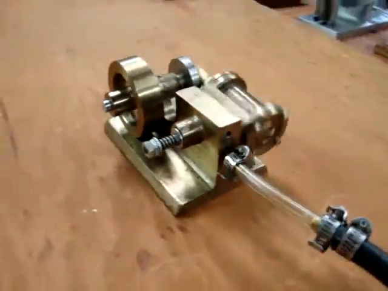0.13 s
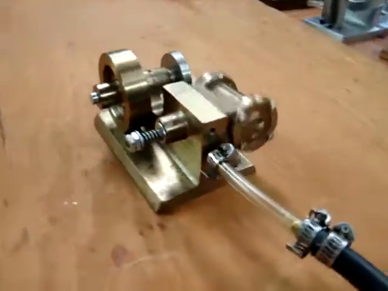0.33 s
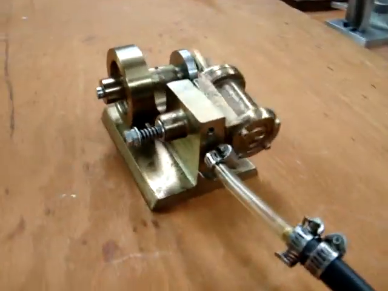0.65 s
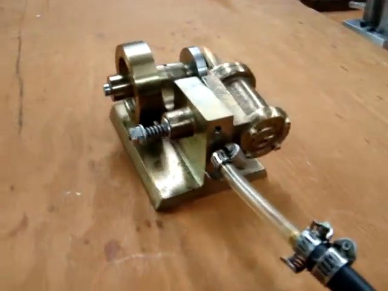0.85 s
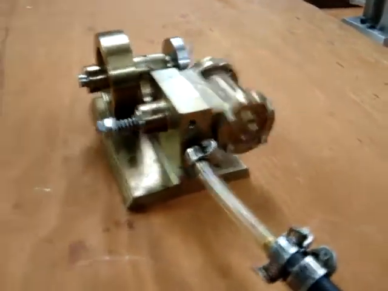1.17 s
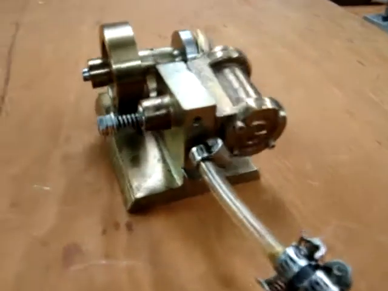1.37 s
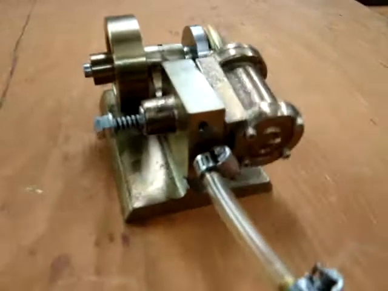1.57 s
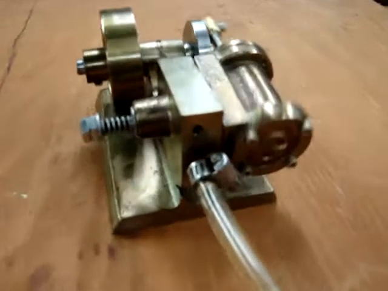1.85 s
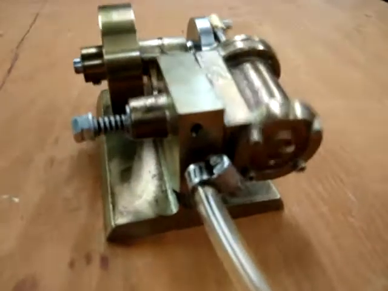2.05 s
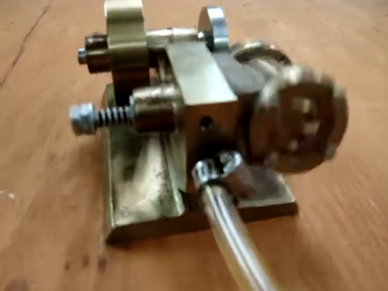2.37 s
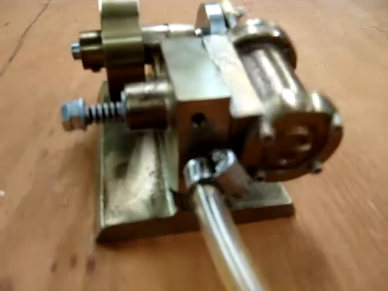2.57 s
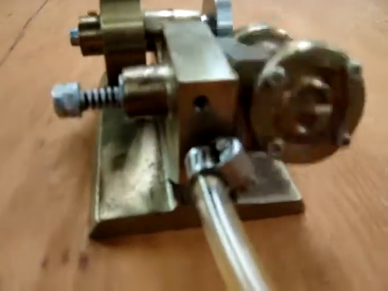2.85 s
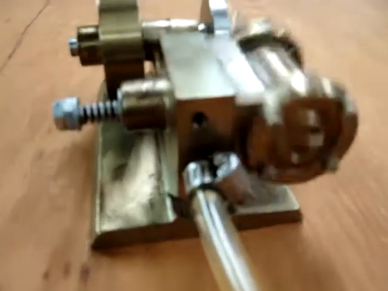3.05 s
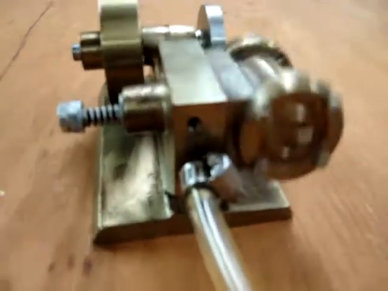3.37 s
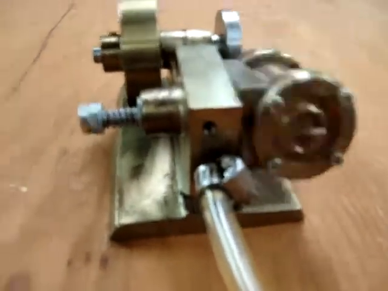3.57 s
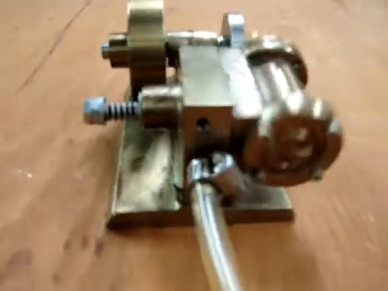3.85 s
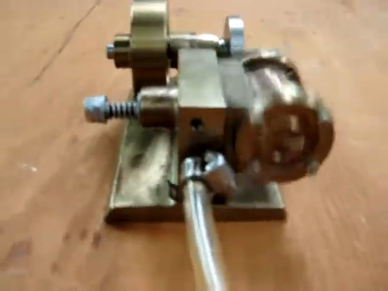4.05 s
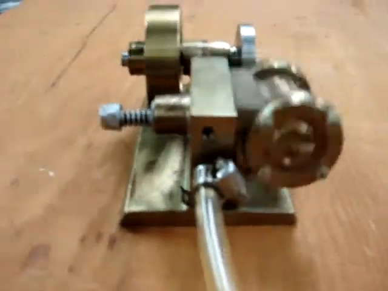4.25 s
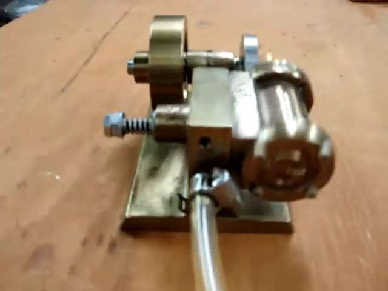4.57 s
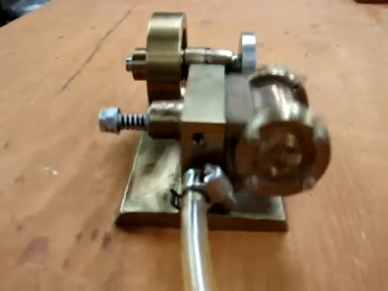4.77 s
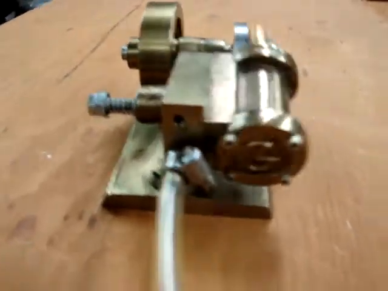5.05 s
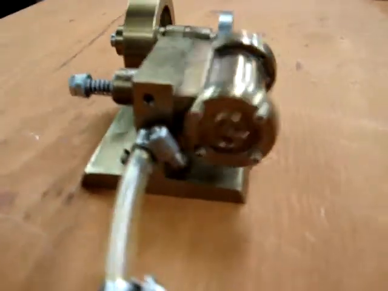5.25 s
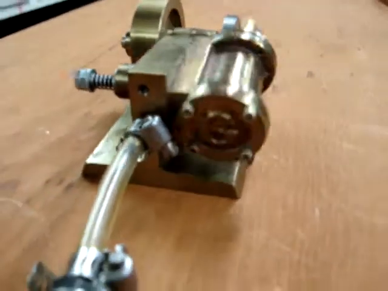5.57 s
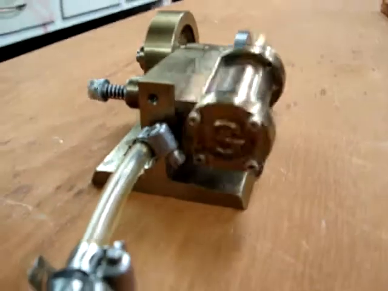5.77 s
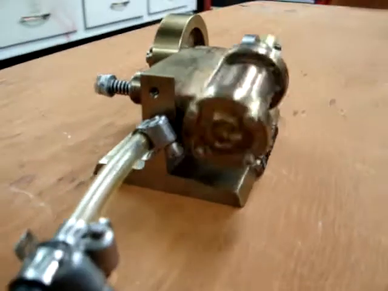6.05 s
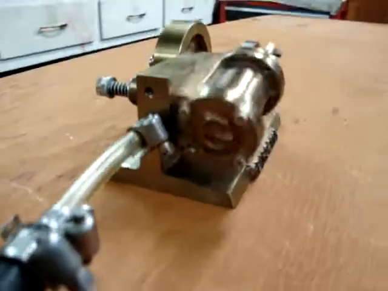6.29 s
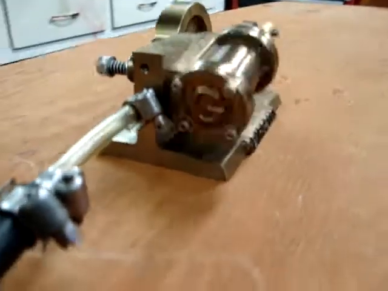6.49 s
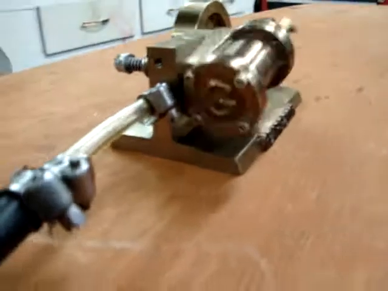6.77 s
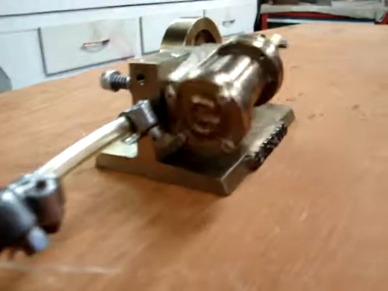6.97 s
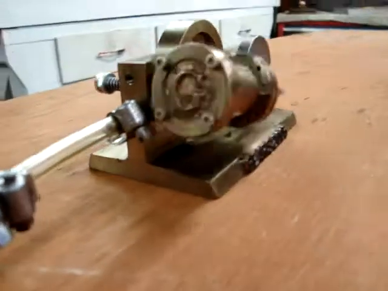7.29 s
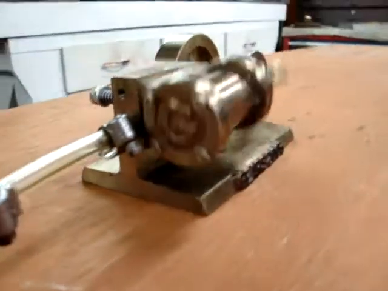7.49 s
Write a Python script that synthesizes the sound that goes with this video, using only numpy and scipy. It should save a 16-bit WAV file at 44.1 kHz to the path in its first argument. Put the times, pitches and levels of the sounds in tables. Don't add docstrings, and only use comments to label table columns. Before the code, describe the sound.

A small brass engine runs on compressed air on a wooden workshop bench, heard close through a thin, bass-light microphone. At 0 s there is dull rumble, a faint shuffle, inlet hiss and a knock; from about 0.05 s bright exhaust blasts recur every 0.23 s, very evenly, to the end at about 7.6 s. Every turn gives a duller pop into a sharp spit, a knock with quick rebounds, a seeping hiss, a weaker second puff, then inlet hiss with another woody knock. Scuffs and faint ringing taps come at 0.6-0.9 s, a stronger scrape at 2.2 s, a dull tap at 4.3 s, shuffles around 5.5-5.8 s, and little clicks at 6.4 and 7.4 s. A faint hum fades by 2.5 s. From about 5.7 s the microphone moves beside the cylinder, and the blasts soften slightly and shift in colour. Short reflections suggest a modest room.

```python
import sys
import numpy as np
from scipy import signal
from scipy.fft import rfft, irfft, next_fast_len
from scipy.io import wavfile
from scipy.ndimage import uniform_filter1d, minimum_filter1d

SR = 44100
rng = np.random.default_rng(int(sys.argv[2]) if len(sys.argv) > 2 else 0)


def dump_mix(stems):
    frames = np.atleast_2d(stems).T
    limited = np.clip(frames, -1, 1)
    pcm = np.round(limited * 32767).astype(np.int16)
    wavfile.write(sys.argv[1], SR, pcm)


def magnitude_from_level(level_db):
    exponent = np.asarray(level_db, float) / 20
    return 10 ** exponent


N = 336483
TIME = np.arange(N) / SR
CUTOFF_HZ = 10300
FIRST_BLAST_S, TURN_S, TURN_COUNT = -.1825, .23372, 35


def rms_one(x):
    return x / np.sqrt(np.mean(x ** 2) + 1e-20)


def coloured(hz, level_db):
    size = next_fast_len(N)
    bins = np.maximum(np.arange(size // 2 + 1) * SR / size, 1)
    gain = magnitude_from_level(np.interp(np.log(bins), np.log(hz), level_db)) * (bins < CUTOFF_HZ)
    white = rng.standard_normal(size)
    return rms_one(irfft(gain * rfft(white), size)[:N])


def flicker(rate_hz):
    settle = 9000
    r = np.exp(-2 * np.pi * rate_hz / SR)
    slow = signal.lfilter([1], [1, -2 * r, r * r], rng.standard_normal(N + settle))
    return rms_one(slow[settle:])


def ring(clicks, hz, t60_s):
    r, w = magnitude_from_level(-60 / (t60_s * SR)), 2 * np.pi * hz / SR
    return signal.lfilter([0, np.sin(w)], [1, -2 * r * np.cos(w), r * r], clicks + 1e-18)


def turns(after_s=0):
    return FIRST_BLAST_S + after_s + TURN_S * np.arange(TURN_COUNT)


# time_s, beside_cylinder (0-1), blast_db, puff_db, bench_db
MICROPHONE_PATH = [(-.2, .4, -27, -36, -34), (.1, 0.01, -26, -40.5, -32.5), (1.3, 0.01, -25, -36, -32),
                   (1.9, 0.03, -26, -36.5, -33), (2.8, 0.01, -25, -32.5, -35), (3.3, .03, -27, -37, -36),
                   (4.1, .02, -25, -37, -35.5), (4.549, .02, -27, -36, -36), (5.3, .02, -24, -38, -34.5),
                   (5.7, 0.13, -28, -41, -34), (6.05, 0.31, -28, -42, -35), (6.55, 0.72, -29, -41, -36.5),
                   (7.63, 0.83, -29, -42.5, -35)]


def walk(s, column):
    rows = np.array(MICROPHONE_PATH)
    return np.interp(s, rows[:, 0], rows[:, column])


# frequency_hz, level_db (per Hz)
RUMBLE_SPECTRUM = [(12, -68), (20, -25), (70, -33), (156, -4.5), (335, 1), (463, -2.5), (532, 2.5),
                   (583, -1), (640, 0.5), (1310, -2), (1940, -10.5), (2680, 2.5), (3450, -7.5),
                   (4450, -7.5), (5000, -22.5), (6500, -67), (11000, -120)]
# time_s, level_db
RUMBLE_LEVEL = [(0.0, -53), (0.59, -53), (0.8, -58), (1.32, -57), (1.68, -56), (2.25, -51), (2.55, -59),
                (3.65, -56.5), (4.65, -54.5), (4.97, -61.5), (5.61, -55), (7.63, -57.5)]


def rumble():
    level_db = np.interp(TIME, *np.transpose(RUMBLE_LEVEL)) + 3.3 * flicker(7.2)
    return magnitude_from_level(level_db) * coloured(*np.transpose(RUMBLE_SPECTRUM))


# start_s, hold_s, t60_s, centre_hz, level_db
SHUFFLE_EVENTS = [(0, 0.04, .15, 1300, -45), (0.359, 0.038, 0.15, 900, -45.5),
                  (0.602, 0.024, 0.16, 1590, -43), (0.743, 0.006, 0.13, 1810, -34.5),
                  (0.803, 0.018, 0.26, 1700, -40), (0.871, 0.012, 0.38, 1620, -41.5),
                  (1.384, 0.051, 0.18, 1200, -52), (1.57, 0.039, 0.18, 1500, -44),
                  (2.206, 0.02, 0.24, 2200, -31.5), (2.24, 0.038, 0.51, 2000, -44),
                  (5.455, 0.028, 0.17, 1340, -41.5), (5.604, 0.035, 0.15, 1200, -48.5),
                  (5.803, 0.11, 0.51, 2200, -47), (6.531, 0.044, 0.19, 900, -47),
                  (6.903, 0.038, .2, 794, -53)]


def shuffles():
    out = np.zeros(N)
    grit = rng.standard_normal(N) * magnitude_from_level(0.79 * flicker(200))
    for s, hold, t60, hz, level_db in SHUFFLE_EVENTS:
        rise = 0.087 * hold
        span = slice(int(s * SR), int((s + rise + hold + t60) * SR))
        t = TIME[span] - s
        decay_db = 60 * np.maximum(t - rise - hold, 0) / t60
        stroke = np.clip(t / rise, 0, 1) * magnitude_from_level(level_db - decay_db)
        band = signal.butter(1, [hz / 2.5, hz * 1.62], "band", fs=SR, output="sos")
        out[span] += stroke * rms_one(signal.sosfilt(band, grit[span]))
    return out


# frequency_hz, start_db, later_db (from 2.5 s on)
HUM_LINES = [(119.3, -78.5, -81), (150, -79, -86), (238.3, -65, -84.5)]


def hum():
    out = np.zeros(N)
    for hz, start_db, later_db in HUM_LINES:
        level_db = np.interp(TIME, [1.1, 2.5], [start_db, later_db]) + flicker(4.5)
        out += np.sqrt(2) * magnitude_from_level(level_db) * np.sin(2 * np.pi * hz * TIME)
    return out


# frequency_hz, level_db (per Hz)
HISS_SPECTRUM = [(20, 3.5), (300, 1.5), (600, -22), (3500, -6.5), (6000, 1.5), (7500, 2), (10000, 3)]


def self_noise():
    return magnitude_from_level(-65) * coloured(*np.transpose(HISS_SPECTRUM))


def jet(turn_db, shape, colour, gust_db):
    after, shape_db = np.transpose(shape)
    jitter_s = 0.00047 * rng.standard_normal(TURN_COUNT)
    scatter_db = 1.16 * rng.standard_normal(TURN_COUNT)
    opening = np.zeros(N)
    for s, level_db in zip(turns() + jitter_s, turn_db + scatter_db):
        span = slice(max(int((s + after[0]) * SR), 0), max(int((s + after[-1]) * SR), 0))
        opening[span] += magnitude_from_level(level_db + np.interp(TIME[span] - s, after, shape_db))

    beside = np.clip(walk(TIME, column=1), 0, 1)
    hz, facing_db, beside_db = np.transpose(colour)
    air = np.sqrt(1 - beside) * coloured(hz, facing_db)
    air += np.sqrt(beside) * coloured(hz, beside_db)

    body = signal.sosfiltfilt(signal.butter(4, 7800, fs=SR, output="sos"), air)
    shadow_db = -3.5 * np.sin(np.pi * np.sqrt(beside))
    top_gain = magnitude_from_level(shadow_db + gust_db * flicker(150))
    return opening * (body * magnitude_from_level(gust_db * flicker(170)) + (air - body) * top_gain)


# after_blast_s, level_db
INLET_OPENING = [(.135, -60), (.15, -13.5), (.163, 0.5), (.18, 2.5), (.19, 4.5), (.2, 1), (.208, 4),
                 (.215, -60)]
# frequency_hz, facing_port_db, beside_cylinder_db (per Hz)
INLET_COLOUR = [(300, -7, -5), (1700, -13.5, -11), (2451, -13, -9.5), (2767, 2.5, 5.5), (3178, -13.5, -23),
                (4270, -26, -27.5), (5420, -5.5, -10), (5610, 3.5, 4), (6200, -11.5, -5.5),
                (7000, -14, 9.5), (7900, -24.5, -13), (8180, -27.5, -28), (10440, 0, -25.5)]


def inlet():
    level_db = np.interp(walk(turns(), column=1), [0, 1], [-45.5, -45.5])
    return jet(level_db, INLET_OPENING, INLET_COLOUR, gust_db=2.5)


# frequency_hz, t60_s, outer_knock_db, inner_knock_db
BENCH_MODES = [(186.2, 0.51, -16.5, -14.5), (231.3, 0.71, -23, -26.5), (288.8, 0.35, -15.5, -35),
               (390, 0.045, -45, -33.5), (425, 0.034, -5.5, -24), (452, 0.068, 0.5, -5),
               (495.4, 0.062, -4, -0.5), (582.7, 0.066, -9.5, -5), (685, 0.043, -11.5, -4),
               (840, 0.086, -18, -13), (914, 0.078, -13.5, -12.5), (1105, 0.033, -10.5, -23),
               (1400, 0.045, -10, -19), (2200, 0.064, -12, -28), (3680, 0.015, -23.5, -33)]
# after_touch_s, share of the blow
OUTER_BOUNCES = [
    (0, 0.78),
    (.017, 0.25),
    (.024, .22),
    (.04, 0.2),
    (0.046, .25),
]
# after_touch_s, share of the blow (sign is the side struck)
INNER_BOUNCES = [
    (.001, 1),
    (0.0126, -0.65),
]


def knocks():
    out = np.zeros(N)
    bearings = magnitude_from_level(-90) * rng.standard_normal(N)
    for hz, t60, outer_db, inner_db in BENCH_MODES:
        clicks = np.append(bearings * magnitude_from_level(outer_db), np.zeros(SR))
        blows = [(.0655, -1.07, outer_db, OUTER_BOUNCES), (.1845, 0, inner_db, INNER_BOUNCES)]
        for after, knock_db, mode_db, touches in blows:
            s = turns(after)
            scatter_db = 1.9 * rng.standard_normal(len(s))
            strength = (s >= 0) * magnitude_from_level(walk(s, column=4) + knock_db - 4.0 + mode_db + scatter_db)
            for later, share in touches:
                clicks[np.maximum(((s + later) * SR).astype(int), 0)] += share * strength
        out += ring(clicks[:N], hz, t60)
    return out


# after_blast_s, level_db
BLAST_OPENING = [(-.016, -67), (-.01, -19), (-.003, 2), (.003, 7), (.012, 2.5), (.021, 0.5), (.027, -8.5),
                 (.034, -36)]
# frequency_hz, facing_port_db, beside_cylinder_db (per Hz)
BLAST_COLOUR = [(300, -30, -29), (1200, -25, -23), (2820, -13.5, -6), (3330, -12, -28), (4840, -7.5, -8.5),
                (5340, -3.5, 0), (6130, -1.5, 3.5), (6770, -21, 6), (7540, -10, 7.5), (7920, -5, 5),
                (9570, 4, 2), (9440, 14.5, 11.5)]


def blast():
    return jet(walk(turns(), column=2), BLAST_OPENING, BLAST_COLOUR, gust_db=2.5)


# after_blast_s, level_db
POP_OPENING = [(-.015, -49.5), (-.011, -16), (-.005, -7), (.0005, -10.5), (.008, -19), (.018, -29),
               (.03, -48)]
# frequency_hz, facing_port_db, beside_cylinder_db (per Hz)
POP_COLOUR = [(300, -16.5, -15), (1200, -8.5, -1.5), (2000, -12, -1), (2680, 3.5, 6), (3120, -4, -14),
              (4270, -1, -11), (5430, 2, -1), (6330, 3, 6), (7200, -9.5, 6.5), (9000, -15, -14.5)]


def pop():
    return jet(walk(turns(), column=2), POP_OPENING, POP_COLOUR, gust_db=1.9)


# after_blast_s, level_db
LEAK_OPENING = [(.015, -21.5), (.03, 5.5), (.045, 4), (.066, 8), (.081, 2), (.086, -3), (.1, 3),
                (.122, 4.5), (.132, -62)]
# frequency_hz, facing_port_db, beside_cylinder_db (per Hz)
LEAK_COLOUR = [(294, -18.5, -21), (1700, -14.5, -12.5), (2300, -5, -4.5), (2930, -14.5, -15.5),
               (4840, -9.5, -17), (5120, -8, -8), (5820, 3.5, -2), (6610, -13, -2), (7150, -12, 0.5),
               (7800, -18, -14.5), (8730, -7, -8.5), (9740, 7, -20.5), (10640, -12, -17)]


def leak():
    level_db = np.interp(walk(turns(), column=1), [0, 1], [-45, -49])
    return jet(level_db, LEAK_OPENING, LEAK_COLOUR, gust_db=3.5)


# after_blast_s, level_db
PUFF_OPENING = [(.084, -41.5), (.092, 8.5), (.1, 4.5), (.108, 11.5), (.118, 0), (.124, -45), (.131, -52)]
# frequency_hz, facing_port_db, beside_cylinder_db (per Hz)
PUFF_COLOUR = [(300, -23, -20.5), (1500, -30.5, -17.5), (2200, -24.5, -22), (2620, -3, -4.5),
               (2860, -9.5, -37), (4430, -8, -13.5), (5600, -5, -6), (6330, -9, 1), (6500, -24.5, -9),
               (7960, -5.5, 7.5), (8750, -4.5, -0.5), (9830, 16, 5.5), (10400, 11.5, 9)]


def puff():
    return jet(walk(turns(), column=3), PUFF_OPENING, PUFF_COLOUR, gust_db=3.03)


def echoes(x):
    dull = signal.sosfilt(signal.butter(2, 3500, fs=SR, output="sos"), x)
    out = x.copy()
    for lag_s, level_db in [(.011, -30), (.023, -16.5), (.037, -17), (.056, -49.5), (.083, -49)]:
        lag = int(lag_s * SR)
        out[lag:] += magnitude_from_level(level_db) * dull[:-lag]
    return out


# start_s, pitch_hz, t60_s, level_db
TAP_EVENTS = [(.6, 1200, 0.33, -48), (0.743, 1196, 0.72, -48), (.876, 1210, 0.27, -45),
              (4.309, 520, 0.13, -35), (4.307, 386, 0.14, -40), (4.307, 637, .08, -44),
              (4.308, 1100, 0.1, -42), (6.43, 1393, 0.064, -36), (7.36, 1355, 0.045, -41)]


def taps():
    out = np.zeros(N)
    for s, hz, t60, level_db in TAP_EVENTS:
        click = magnitude_from_level(level_db) * (np.arange(N) == int(s * SR))
        out += ring(click, hz, t60)
    return out


def scene():
    shop = rumble() + shuffles() + taps()
    engine = inlet() + knocks() + blast() + pop() + leak() + puff()
    return (echoes(engine) + shop)[None]


def gate(x, margin_db, wander_db, low_hz, least_db, tilt_db):
    hz, _, cells = signal.stft(x, SR, nperseg=256)
    power = uniform_filter1d(np.abs(cells) ** 2, size=7, axis=0)
    level_db = 10 * np.log10(uniform_filter1d(power, size=3, axis=1) + 1e-20)
    bands, frames = level_db.shape
    loudest_db = -minimum_filter1d(-level_db[hz > low_hz].max(axis=0), size=17)

    luck = rng.standard_normal((bands // 3 + 1, frames // 5 + 1))
    luck = luck.repeat(3, axis=0).repeat(5, axis=1)[:bands, :frames]
    loudest_db += 2.5 * rng.standard_normal(frames // 8 + 1).repeat(8)[:frames]

    threshold_db = np.maximum(loudest_db - margin_db, least_db)
    threshold_db = threshold_db + tilt_db * np.log2(hz[:, None] / low_hz + .01)
    above_db = level_db - threshold_db + wander_db * luck
    soft_switch = 1 / (1 + magnitude_from_level(np.clip(-20 * above_db, -99, 99)))
    kept = np.where(hz[:, None] > low_hz, soft_switch, 1)
    return signal.istft(cells * kept, SR, nperseg=256)[1][:N]


def top_cut(x):
    return signal.sosfilt(signal.butter(12, 10990, fs=SR, output="sos"), x)


def record(dry):
    x = signal.sosfilt(signal.butter(4, 274.6, "high", fs=SR, output="sos"), dry[0])
    x = x + hum() + self_noise()
    x = gate(x, margin_db=29.5, wander_db=4.5, low_hz=3620, least_db=-83.5, tilt_db=3.0)
    x = signal.sosfilt(signal.cheby2(12, 60, CUTOFF_HZ + 200, fs=SR, output="sos"), x)
    return top_cut(x[None])


dry = scene()
out = record(dry)
dump_mix(out)
```